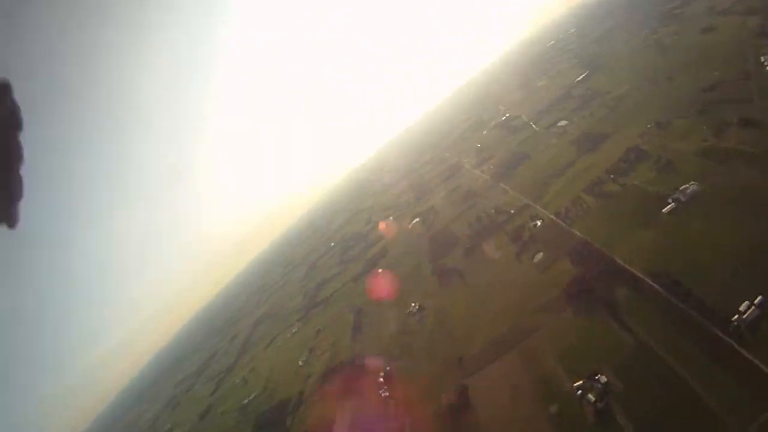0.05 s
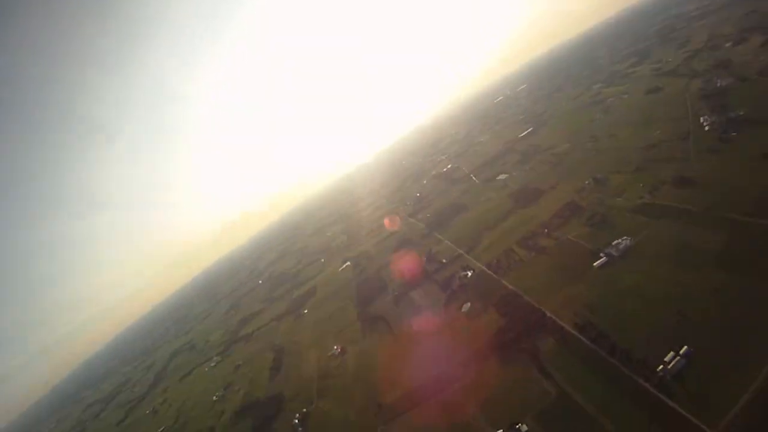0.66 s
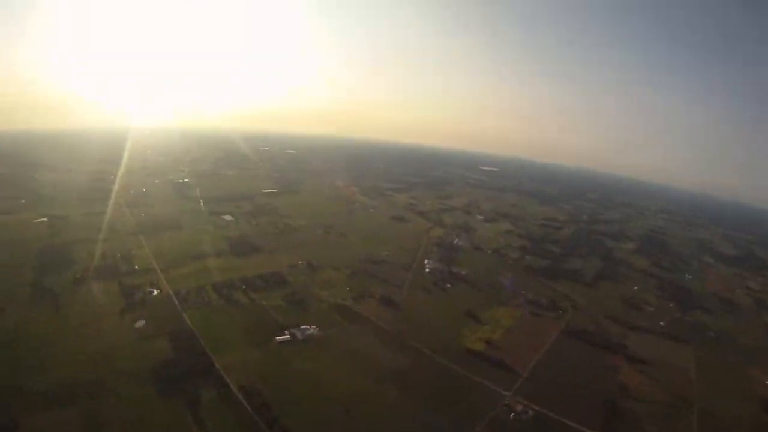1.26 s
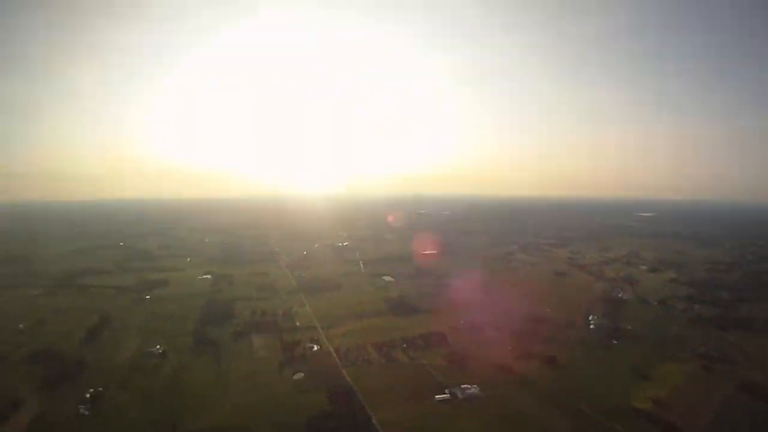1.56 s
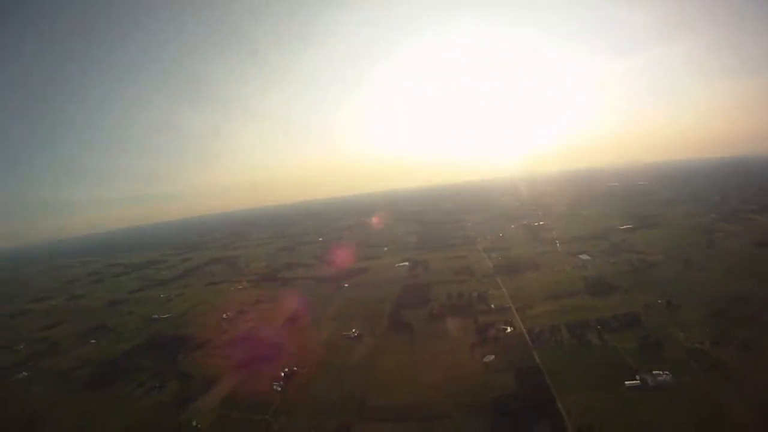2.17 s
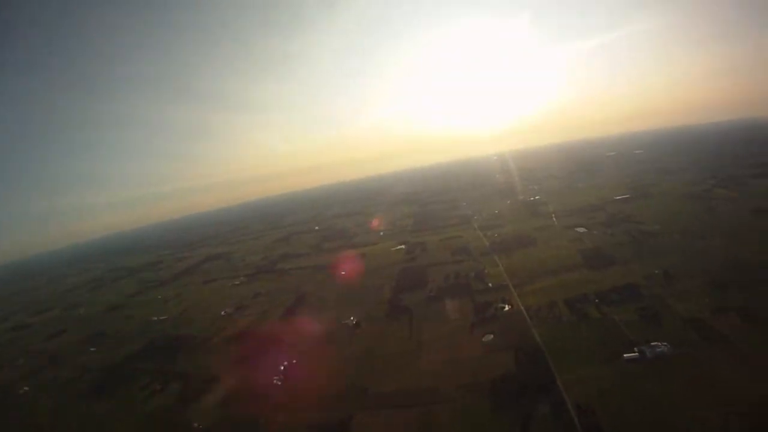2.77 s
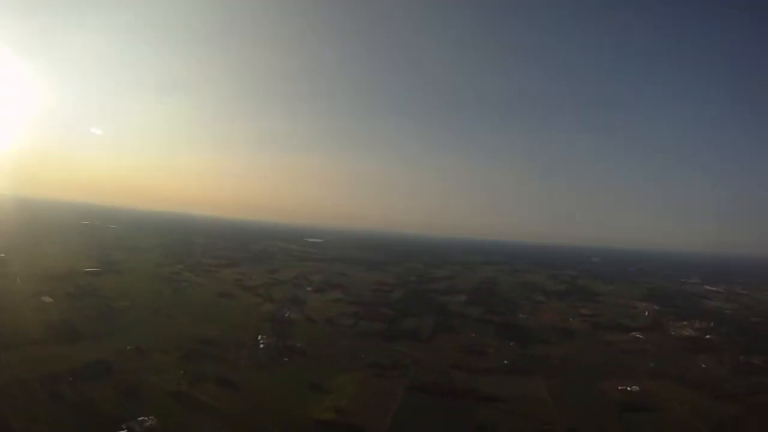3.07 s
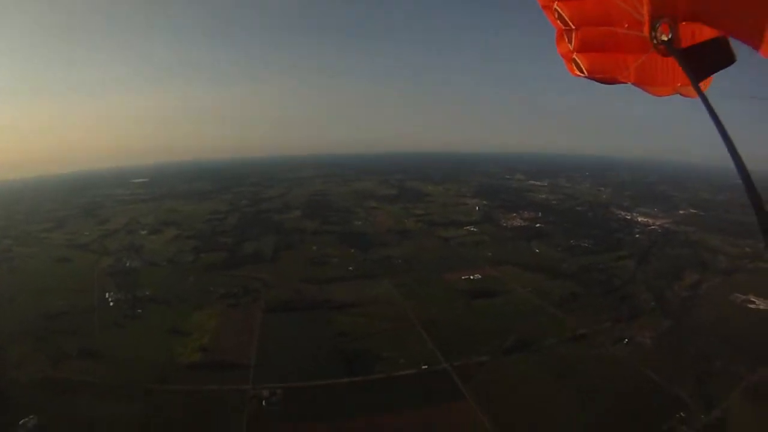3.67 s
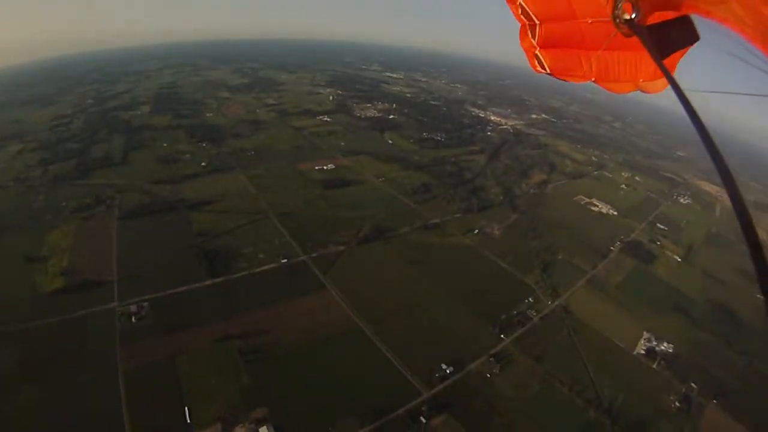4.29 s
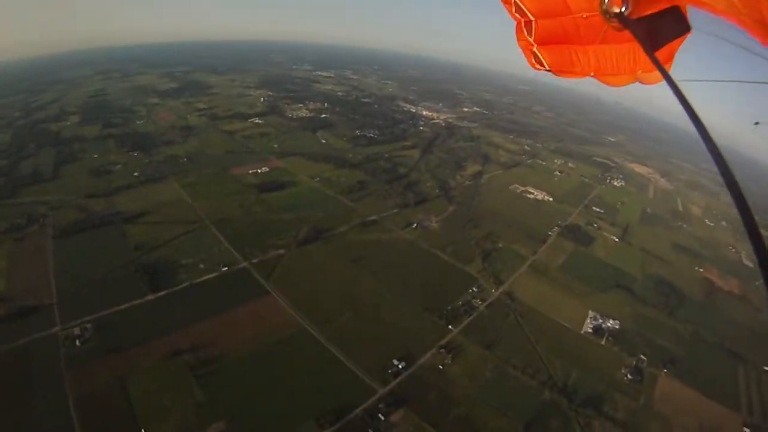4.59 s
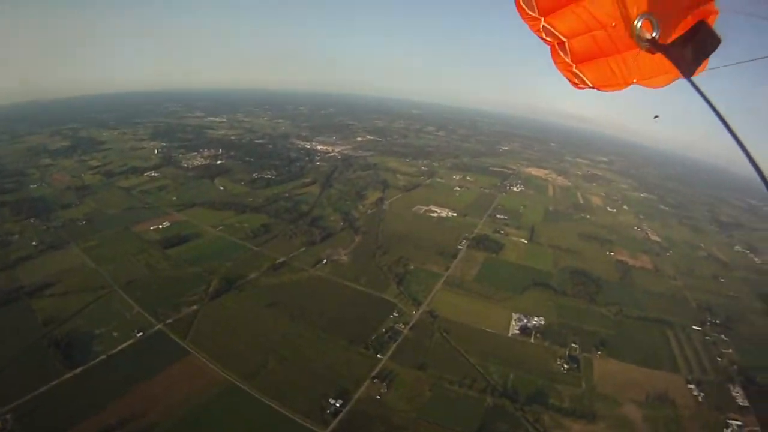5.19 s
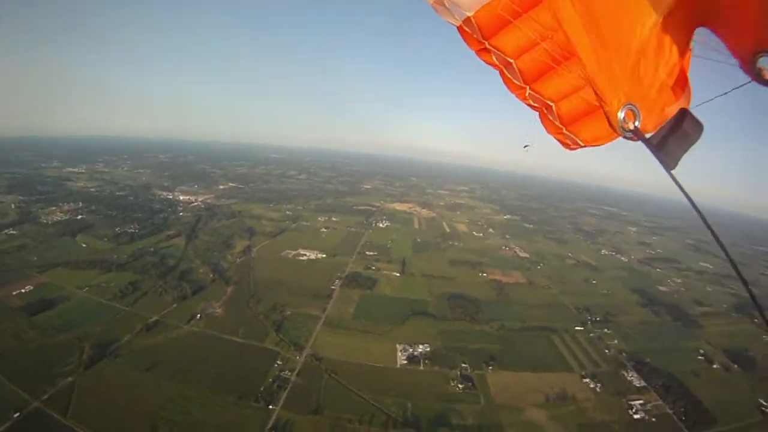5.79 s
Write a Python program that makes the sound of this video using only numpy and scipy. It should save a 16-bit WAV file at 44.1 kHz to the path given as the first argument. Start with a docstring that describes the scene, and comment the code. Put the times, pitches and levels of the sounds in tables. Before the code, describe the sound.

A parachute flaps and snaps in loud, buffeting wind, giving way to a few dull thumps and a quieter rush of air.

```python
"""Wind roars and fabric cracks about twelve times a second: a parachute opening above a skydiver.
The air streams past a small camera, ringing through its closed plastic case, while eddies rumble
and tugs on the harness jolt it. As the fall slows the flapping dies away, and after three seconds
a softer, steady rush with a thin whistle remains. The camera's limiter holds down the peaks,
and its coarse, unsmoothed 12 kHz converter adds a gritty top."""
import sys
import numpy as np
from scipy import signal
from scipy.fft import rfft, irfft, next_fast_len
from scipy.io import wavfile
from scipy.ndimage import uniform_filter1d

SR = 44100
rng = np.random.default_rng(int(sys.argv[2]) if len(sys.argv) > 2 else 0)


def output_pcm(signal):
    """Save a mono or channel-first signal as 16-bit PCM at the path in sys.argv[1].

    Samples are clipped to [-1, 1] before scaling.
    """
    pcm = np.clip(np.atleast_2d(signal).T, -1, 1) * 32767
    wavfile.write(sys.argv[1], SR, np.round(pcm).astype(np.int16))


N = 257984
TIME = np.arange(N) / SR


def from_db(db):
    """Decibels to gain."""
    return 10 ** (np.asarray(db) / 20)


def shaped_noise(gain_at):
    """Noise of unit power whose spectrum follows a function of frequency."""
    size = next_fast_len(N)
    hz = np.maximum(np.arange(size // 2 + 1) * SR / size, 1)
    noise = irfft(rfft(rng.standard_normal(size)) * gain_at(hz), size)[:N]
    return noise / np.sqrt(np.mean(noise ** 2) + 1e-20)


def coloured(points):
    """Noise of unit power, its tone drawn through (Hz, dB) points."""
    point_hz, level_db = np.transpose(points)
    return shaped_noise(lambda hz: from_db(np.interp(np.log(hz), np.log(point_hz), level_db)))


def drift(rate_hz):
    """Random wandering up to about rate_hz times a second; spread 1."""
    return shaped_noise(lambda hz: 1 / (1 + (hz / rate_hz) ** 2))


def swell(centre_s, half_length_s):
    """A smooth rise and fall of height 1."""
    return np.exp(-np.minimum(((TIME - centre_s) / half_length_s) ** 2, 20))


# The wind's fader ride. Each row: time in seconds, level in dB.
AIRFLOW = [(0.0, -23), (0.23, -22.5), (0.55, -22), (1.46, -25), (1.69, -27), (2.17, -28), (2.85, -35),
           (3.24, -34.5), (3.5, -39), (4.07, -38), (4.24, -39), (5.51, -39), (5.85, -36)]
FULL_FLOW_DB = -23

def airflow_db():
    """The strength of the airstream, easing as the parachute slows the fall."""
    return np.interp(TIME, *np.transpose(AIRFLOW))


# The wind's tone in the fast fall and the slow descent. Each row: frequency in Hz, relative level in dB.
FAST_AIR = [(100, -21), (250, -5.5), (450, -11.5), (750, -10.5), (1000, -11.5), (1500, -9), (2000, -2.5),
            (2500, -2), (2950, -9), (3400, -8), (4000, -14), (4700, -18.5), (5300, -17), (6000, -31.5)]
SLOW_AIR = [(100, -34), (250, -6.5), (450, -10.5), (750, -13), (1000, -12), (1500, -7.5), (2000, -1),
            (2500, -0.5), (2950, -9), (3400, -6), (4000, -15), (4700, -18), (5400, -17.5), (6000, -29)]

def rush(fast_db, slow_db, slows_from_s, slows_until_s, eddy_hz, fast_flutter_db, slow_flutter_db):
    """Turbulent air billows round each flap and flutters with eddies, smoother as the fall slows."""
    slow = np.clip((TIME - slows_from_s) / (slows_until_s - slows_from_s), 0, 1)
    fast_air = from_db(fast_db) * np.sqrt(1 - slow) * coloured(FAST_AIR)
    slow_air = from_db(slow_db) * np.sqrt(slow) * coloured(SLOW_AIR)
    billow_db = np.minimum(sum(swell(s + RECOIL_S, half_length_s=0.026) for s, *_ in FLAPS), 1)
    flutter_db = (fast_flutter_db * (1 - slow) + slow_flutter_db * slow) * drift(eddy_hz)
    grain_db = 0.57 * drift(rate_hz=450)
    return (fast_air + slow_air) * from_db(airflow_db() + billow_db + flutter_db + grain_db)


# The boxy ring of the plastic case. Each row: frequency in Hz, width in Hz, boost in dB.
CASE_RESONANCES = [(710, 97, 3), (1120, 112, 8), (1690, 23, 2), (2163, 247, 5), (2710, 155, 2.5),
                   (3155, 81, 4), (4350, 550, 1.5), (5180, 190, 7)]

def through_case(sound):
    """Each resonance of the case lifts its own narrow band and rings briefly."""
    for hz, width_hz, boost_db in CASE_RESONANCES:
        b, a = signal.iirpeak(hz, hz / width_hz, fs=SR)
        sound = sound + (from_db(boost_db) - 1) * signal.lfilter(b, a, sound)
    return sound


# The low end: wind rumble and case boom. Each row: frequency in Hz, relative level in dB.
RUMBLE_TONE = [(10, -1), (22, -4), (40, 9.5), (60, -8), (90, 4.5), (150, -14), (400, -77)]
BOOM_TONE = [(40, -12), (65, -4), (90, 0.5), (112, -7), (135, -7.5), (200, -18), (320, -21.5), (480, -34.5),
             (1000, -39.5)]
# Large eddies leaning on the case.
# Each row: centre in seconds, half length in seconds, rumble lift in dB, boom lift in dB.
GUSTS = [(0.2, 0.045, 5.5, 8.5), (0.47, 0.2, 3, 5), (2.396, 0.14, 0, 2.5), (5.6, 0.43, -3, 4)]

def buffeting(rumble_db, rumble_follows, boom_db, boom_follows, lump_db, lump_hz, surge_db, surge_hz):
    """Large eddies rumble in lumps and keep the case booming on its mount; both ease with the wind."""
    flow_db = airflow_db() - FULL_FLOW_DB
    rumble_ride_db = rumble_db + rumble_follows * flow_db + surge_db * drift(surge_hz)
    boom_ride_db = boom_db + boom_follows * flow_db
    for centre_s, half_length_s, rumble_lift_db, boom_lift_db in GUSTS:
        gust = swell(centre_s, half_length_s)
        rumble_ride_db += rumble_lift_db * gust
        boom_ride_db += boom_lift_db * gust
    rumble = from_db(rumble_ride_db) * coloured(RUMBLE_TONE)
    boom = from_db(boom_ride_db) * coloured(BOOM_TONE)
    return (rumble + boom) * from_db(lump_db * drift(lump_hz))


# Flaps of the fabric, each ending in a crack.
# Each row: peak time in seconds, relative level in dB, half length in seconds.
FLAPS = [(0.0304, -7.5, 0.0077), (0.116, -7, 0.0037), (0.191, -7.5, 0.0019), (0.2667, 11, 0.0026),
         (0.3478, 0, 0.00057), (0.417, -6, 0.0031), (0.5018, -8, 0.0034), (0.6634, -6, 0.0015),
         (0.7462, 4, 0.0018), (0.756, -3.5, 0.0023), (0.9073, -5, 0.0059), (0.9916, -3.5, 0.0032),
         (1.0133, -12, 0.0025), (1.0598, -14, 0.0038), (1.1692, -7, 0.0022), (1.247, -9, 0.005),
         (1.3318, 0.5, 0.0022), (1.4235, -3.5, 0.00081), (1.5909, 1.5, 0.0019), (1.675, -3, 0.0026),
         (1.7696, -8, 0.0031), (1.9445, -6, 0.0032), (2.0403, -1.5, 0.0018), (2.089, -21, 0.0066),
         (2.213, -15, 0.01), (2.964, -24, 0.0061)]
RECOIL_S, RECOIL_JITTER_S = 0.00954, 0.0021   # the cloth whips back this long after a crack

def cracks(recoil_half_s=0.0014, crinkle_half_s=0.0011, crinkle_count=24):
    """Each flap cracks and recoils, and small creases crinkle at random; gives rows like FLAPS."""
    air_db = airflow_db()
    rows = []
    for s, crack_db, half_length_s in FLAPS:
        late, strong = rng.standard_normal(2)
        recoil_s = s + RECOIL_S + RECOIL_JITTER_S * late
        recoil_db = np.interp(s, TIME, air_db) + 10.5 + 1.5 * strong
        rows += [(s, crack_db, half_length_s), (recoil_s, recoil_db, recoil_half_s)]
    due = np.cumsum(from_db(air_db - FULL_FLOW_DB) ** 4)   # creases thin out steeply as the air weakens
    shares = (np.arange(crinkle_count) + rng.random(crinkle_count)) / crinkle_count
    for s in np.interp(shares, due / due[-1], TIME):
        crinkle_db = np.interp(s, TIME, air_db) + 6 - 1.5 * rng.standard_normal()
        rows.append((s, crinkle_db, crinkle_half_s))
    return rows


# The bite of a crack. Each row: frequency in Hz, relative level in dB.
CRACK_TONE = [(150, -12.5), (480, -17.5), (700, -10), (900, -25), (1250, -11), (1550, -7.5), (1900, -3.5),
              (2300, 5), (2550, 2), (2850, -19), (3400, -6.5), (3850, -21), (4700, -19.5), (5300, -25.5)]

def fabric(level_db, swish_db, swish_s, lead_s, ripple_db):
    """Cloth snaps in the wind: each crack is a burst of a few milliseconds inside a rippling swish."""
    burst, swish = np.zeros(N), np.zeros(N)
    for s, crack_db, half_length_s in cracks():
        near = slice(*np.searchsorted(TIME, [s - .03, s + .06]))
        age = TIME[near] - s
        burst[near] += from_db(crack_db) * .25 ** ((age / half_length_s) ** 2)
        swish[near] += from_db(crack_db + swish_db) * np.exp(-np.maximum(age / swish_s, -age / lead_s))
    noise = coloured(CRACK_TONE)
    noise /= np.sqrt(uniform_filter1d(noise ** 2, size=100) + 1e-9)   # so the envelope sets the punch
    ripple = from_db(ripple_db * drift(rate_hz=74))
    return from_db(level_db) * noise * np.hypot(burst, swish * ripple)


# Thumps through the harness.
# Each row: swing start in seconds, swing level in dB, swing pitch in Hz, knock level in dB.
JOLTS = [(0.472, -8.5, 93.5, -37), (1.443, -9.5, 114, -21), (1.783, -30, 93, -23.5), (2.096, -14, 101, -23),
         (2.256, -12.5, 101, -45), (2.342, -19, 92, -45), (3.045, -33, 60, -30.5), (3.059, -6, 96, -29),
         (3.154, -12.5, 92, -30), (5.711, -19, 77.5, -46)]

def harness_jolts(rise_s, ring_s, knock_lead_s, knock_s, knock_cutoff_hz):
    """A tug makes a dull knock and then swings the case for a few cycles."""
    out = np.zeros(N)
    dull_noise = shaped_noise(lambda hz: 1 / (1 + (hz / knock_cutoff_hz) ** 4))
    for start_s, swing_db, hz, knock_db in JOLTS:
        knock_age = np.maximum(TIME - start_s + knock_lead_s, 0)
        knock = dull_noise * np.exp(-knock_age / knock_s) * (knock_age > 0)
        age = np.maximum(TIME - start_s, 0)
        swing = np.sin(2 * np.pi * hz * age) * (1 - np.exp(-age / rise_s)) * np.exp(-age / ring_s)
        out += from_db(swing_db) * swing + from_db(knock_db) * knock
    return out


# A low and a high whistle. Each row: pitch in Hz, half width in Hz, waver as a share of the pitch,
# start in seconds, start of the fade in seconds, level in dB.
WHISTLE_TONES = [(1031, 39, 0.00298, 3.15, 6.0, -49), (3580, 100, 0.012, 3.08, 5.3, -48.5)]
# The stream meets the edge squarely and a tone blooms.
# Each row: centre in seconds, half length in seconds, low tone lift in dB, high tone lift in dB.
WHISTLE_SWELLS = [(3.107, 0.015, 0, 14), (3.19, 0.045, 7, 0), (3.28, 0.055, 1, 7.5), (3.47, 0.067, 3.5, 6),
                  (4.723, 0.08, 5, 1.5), (5.117, 0.12, 3, 7), (5.7, 0.6, 6, -2.5)]

def whistle(flutter_db, waver_hz, attack_s, release_s):
    """Settled air sings over an edge in two breathy tones, their pitch wavering with its speed."""
    out, speed = np.zeros(N), drift(waver_hz)
    lifts_db = sum(np.outer(lift_db, swell(s, half_s)) for s, half_s, *lift_db in WHISTLE_SWELLS)
    for (hz, half_width_hz, waver, start_s, fade_s, level_db), lift_db in zip(WHISTLE_TONES, lifts_db):
        fade_in = np.clip((TIME - start_s) / attack_s, 0, 1)
        fade_out = np.exp(-np.maximum(TIME - fade_s, 0) / release_s)
        phase = 2 * np.pi * np.cumsum(hz * (1 + waver * speed)) / SR
        narrow_noise = drift(half_width_hz) * np.cos(phase) + drift(half_width_hz) * np.sin(phase)
        gain = from_db(level_db + lift_db + flutter_db * drift(rate_hz=12))
        out += narrow_noise * fade_in * fade_out * gain
    return out


def scene():
    """Rush and cracks ring through the case; rumble, jolts and whistle reach the microphone directly."""
    air = rush(fast_db=-2.5, slow_db=-1.52, slows_from_s=1.95, slows_until_s=3.06,
               eddy_hz=40, fast_flutter_db=0.68, slow_flutter_db=0.4)
    cloth = fabric(level_db=-5.5, swish_db=-12.5, swish_s=0.012, lead_s=0.0028, ripple_db=5.5)
    low_end = buffeting(rumble_db=-33, rumble_follows=0.7, boom_db=-30.0, boom_follows=0.35,
                        lump_db=0.92, lump_hz=20, surge_db=1.0, surge_hz=6.1)
    tugs = harness_jolts(rise_s=0.0024, ring_s=0.02, knock_lead_s=0.006, knock_s=0.0088,
                         knock_cutoff_hz=614)
    edge_tones = whistle(flutter_db=0.8, waver_hz=14.87, attack_s=0.024, release_s=0.073)
    return (through_case(air + cloth) + low_end + tugs + edge_tones)[None]


def limiter(sound, threshold_db, release_db_per_s, attack_s):
    """A peak over the threshold pulls the gain down, which then climbs back at a steady rate."""
    over_db = np.maximum(20 * np.log10(np.abs(sound) + 1e-9) - threshold_db, 0)
    climb_db = release_db_per_s * TIME
    held_db = np.maximum.accumulate(over_db + climb_db, axis=-1) - climb_db
    pole = np.exp(-1 / (attack_s * SR))
    return sound * from_db(-signal.lfilter([1 - pole], [1, -pole], held_db))


def converter(sound, rate_hz, band_hz, ceiling):
    """A coarse converter clips and holds each sample; the steps mirror the sound into the treble."""
    banded = signal.sosfilt(signal.butter(8, band_hz, fs=SR, output="sos"), sound)
    samples = np.clip(signal.resample_poly(banded, rate_hz, SR, axis=-1), -ceiling, ceiling)
    steps = np.repeat(samples, 8, axis=-1)
    return signal.resample_poly(steps, SR, 8 * rate_hz, axis=-1)[:, :N]


def record(dry):
    """The camera's chain: limiter, overload, gritty converter, then a steep cut above 15280 Hz."""
    limited = limiter(dry, threshold_db=-1.0, release_db_per_s=133, attack_s=0.0023)
    clipped = np.clip(limited, -1.1, 1.1)
    gritty = converter(clipped, rate_hz=12000, band_hz=5750, ceiling=0.92)
    return signal.sosfilt(signal.ellip(14, .1, 100, 15280, fs=SR, output="sos"), gritty)


dry = scene()
out = record(dry)
output_pcm(out)
```